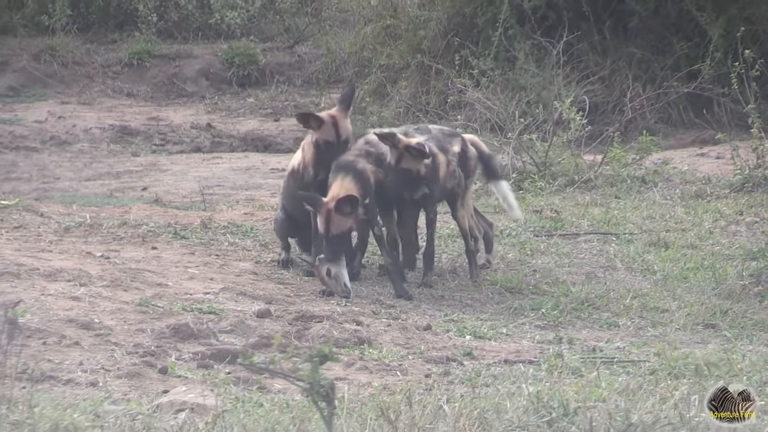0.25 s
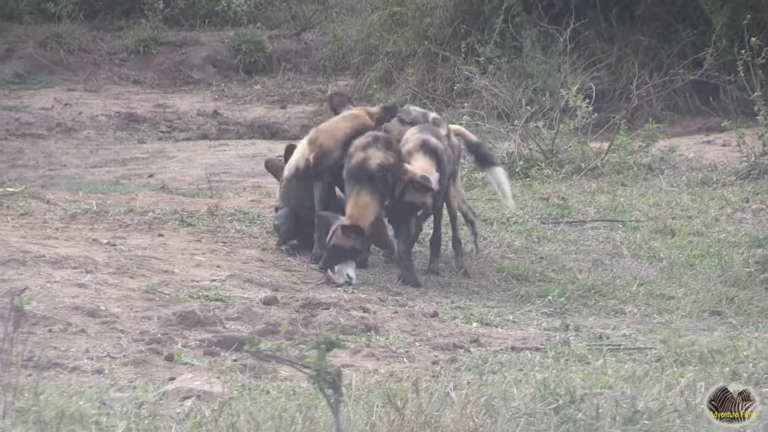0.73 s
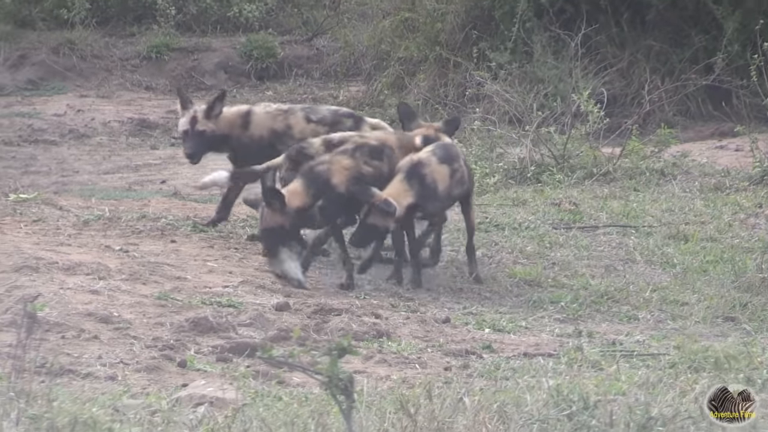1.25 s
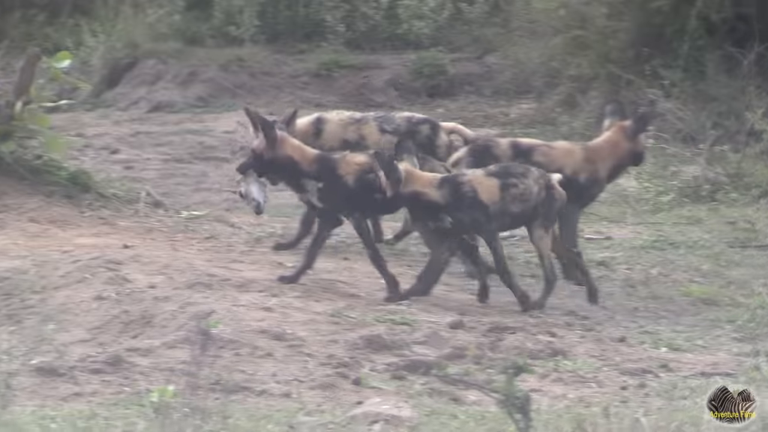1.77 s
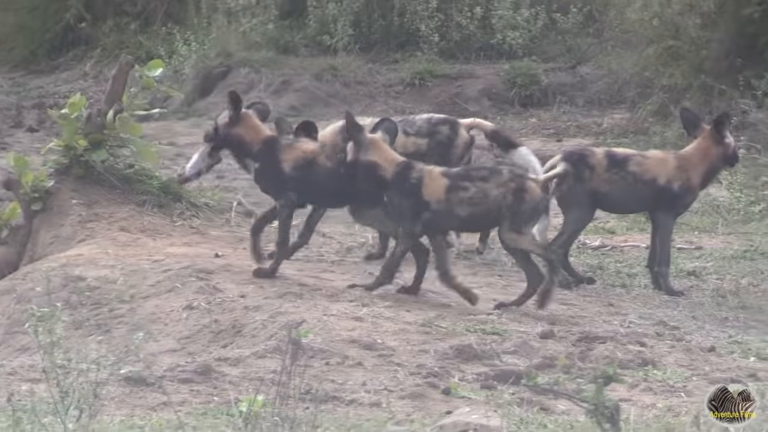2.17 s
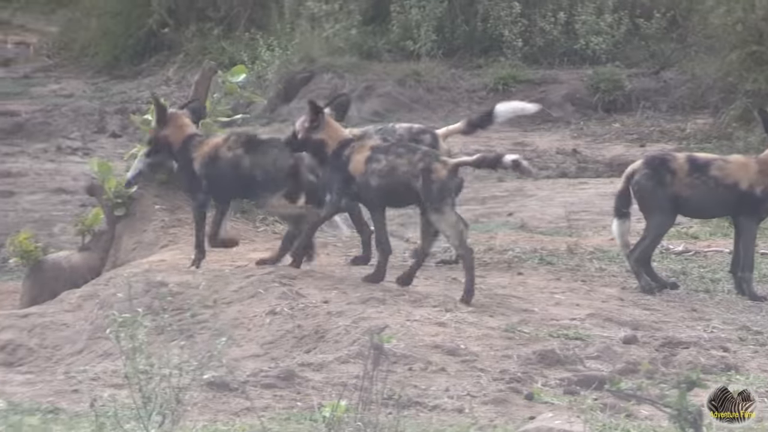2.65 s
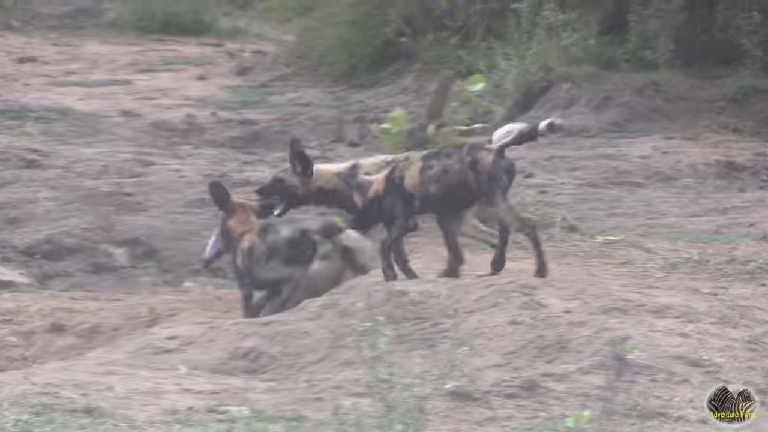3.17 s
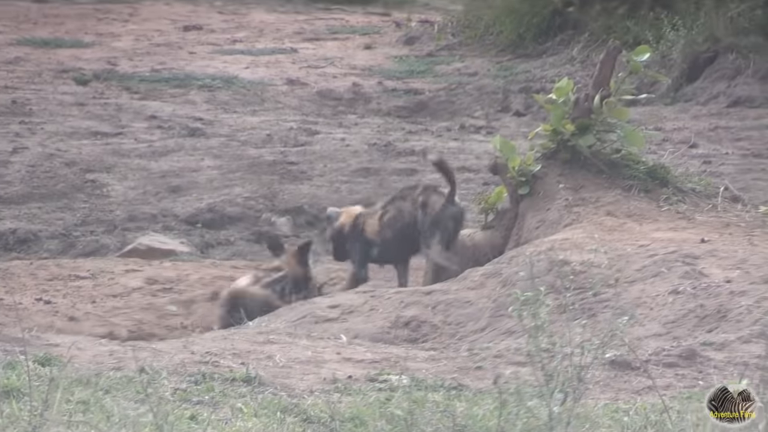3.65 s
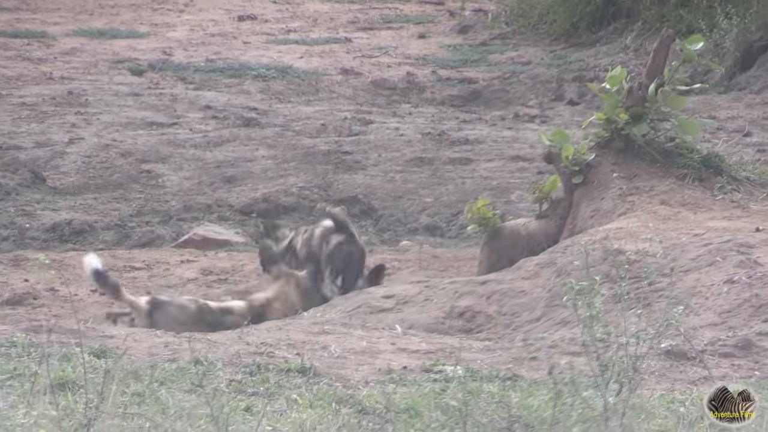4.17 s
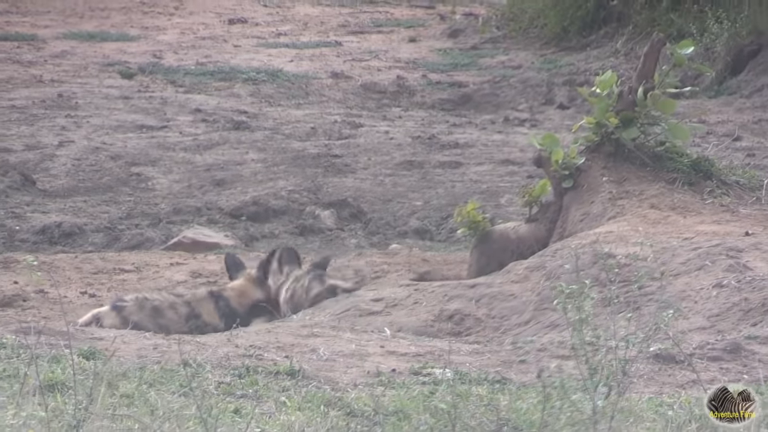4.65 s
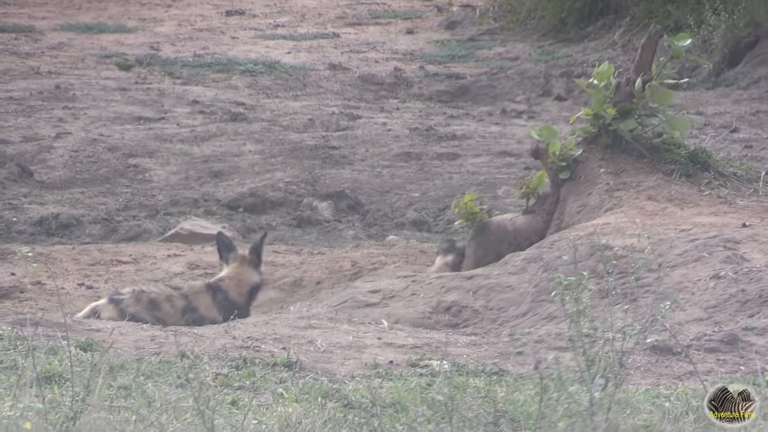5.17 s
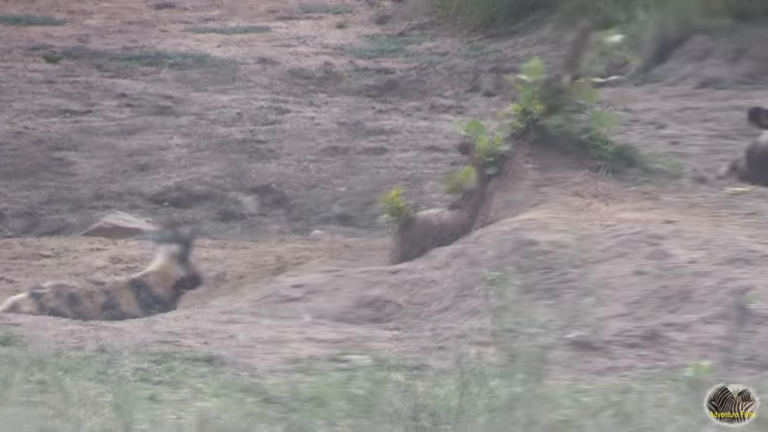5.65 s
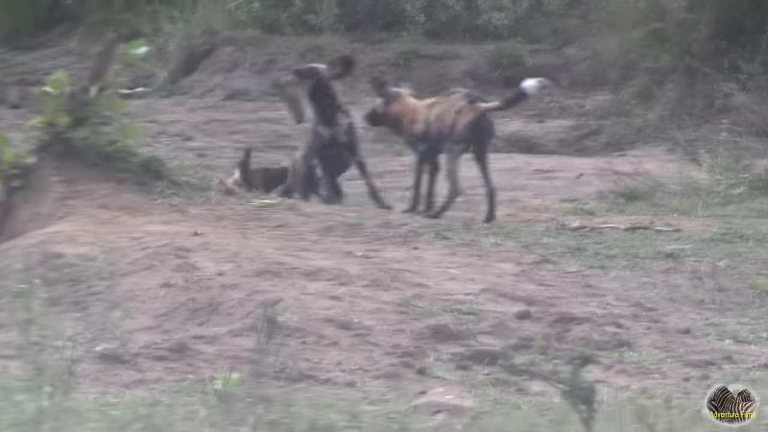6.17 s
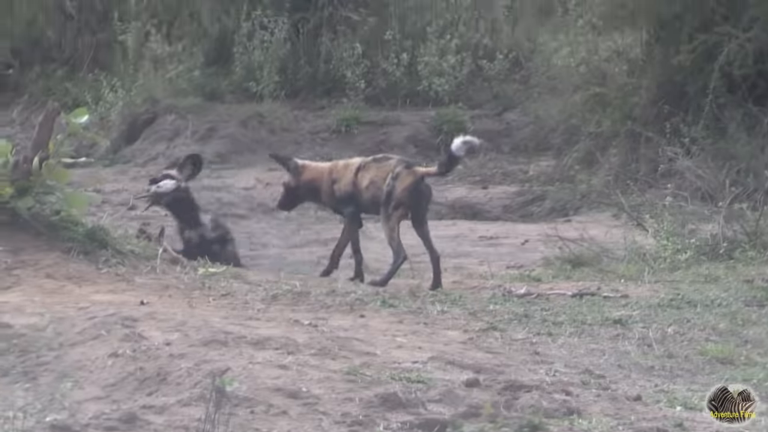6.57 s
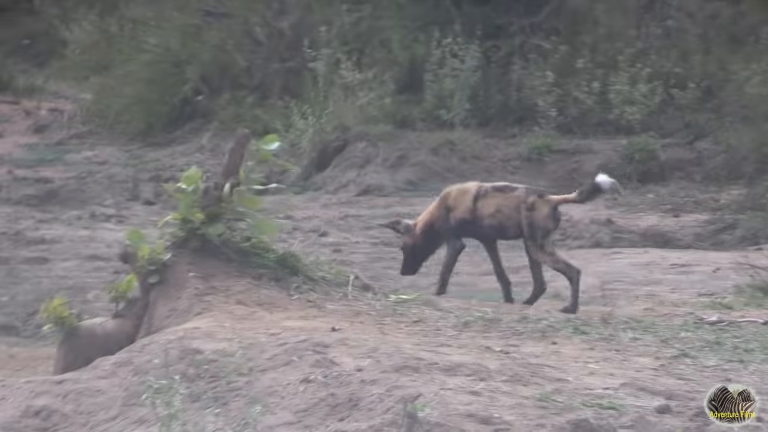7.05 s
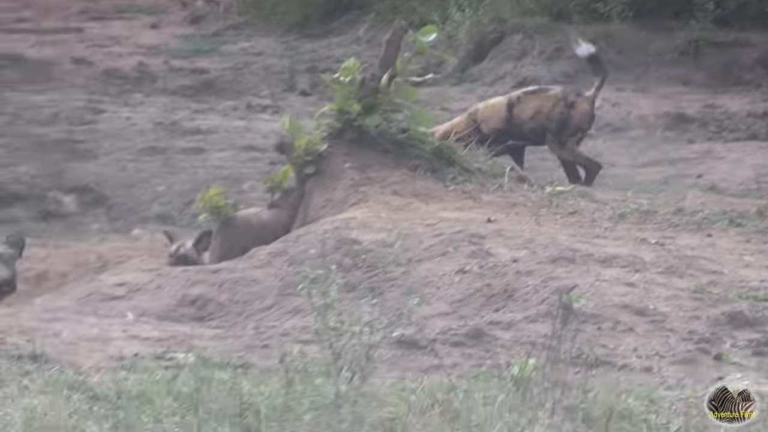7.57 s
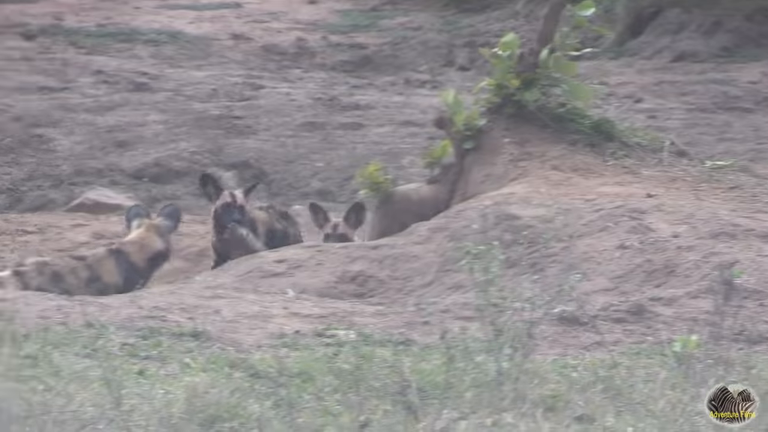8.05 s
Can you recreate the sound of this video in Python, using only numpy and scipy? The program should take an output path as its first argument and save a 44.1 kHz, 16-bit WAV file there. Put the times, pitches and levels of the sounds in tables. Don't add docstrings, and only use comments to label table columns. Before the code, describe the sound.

Open bush, wind gusting low and lumpy on an exposed microphone over soft air, insect hiss and a faint motor hum. Small birds and young wild dogs twitter, buzz and yelp faintly far off, with two runs of peeps. Near five seconds heavy wind blows thump while a warbler chirps quickly. From six seconds a close ground bird dominates with piercing squeals, pips and raspy croaks, repeated rhythmically until the end.

```python
import sys
import numpy as np
from scipy import signal
from scipy.fft import rfft, irfft, next_fast_len
from scipy.io import wavfile
from scipy.ndimage import uniform_filter1d

SR = 44100
rng = np.random.default_rng(int(sys.argv[2]) if len(sys.argv) > 2 else 0)


def to_wav(s):
    ch = np.atleast_2d(s).T
    pcm = np.round(np.clip(ch, -1, 1) * 32767)
    wavfile.write(sys.argv[1], SR, pcm.astype(np.int16))


def invert_db(x):
    u = np.asarray(x, float) / 20
    return 10 ** u


N = 366471

# t/s, level/dB, extra flutter level/dB
WIND_STRENGTH = [(0, -45.5, -2.5), (.5, -41.5, -2), (.7, -48, -1.5), (1.2, -48.5, -2.5), (2.2, -48, -10.5),
                 (2.55, -48, 1.5), (2.9, -43.5, -17), (3.3, -46.5, 1.5), (3.8, -44, -6), (4.75, -43.5, 3.5),
                 (4.9, -38.5, 10.5), (5.5, -36, 6.5), (5.95, -38, 6), (6.2, -36.5, 1.5), (7, -36, -1),
                 (7.548, -34.5, -5.5), (8.05, -41, -4.5), (8.31, -53, 23)]
# t/s, extra thud level/dB, extra flutter level/dB
GUSTS = [(.22, 4.5, 8.5), (.44, 6.5, 5.5), (2.7, -31, -3.5), (3.4, 4, 6.5), (3.6, 3.5, 13.5),
         (4.08, 5.5, 9), (3.95, -1, 4.5), (4.3, -2.5, -7), (4.4, 1.5, 2.5), (4.87, 3, 2.5), (5.02, 2, 2.5),
         (5.11, -1, -23), (5.25, 0, -0.5), (5.34, 7, 6), (5.441, 8.5, 1.5), (5.87, 2, 4.5), (6.06, -1, -30),
         (6.82, 0.5, 3.5), (7.0, 2.5, -3), (6.322, -4, 7), (6.48, -3, -7), (6.7, -0.5, -1.5),
         (7.174, -7, 8), (7.3, 0.5, -6), (7.42, -9, 5), (7.66, -6.5, -8), (7.73, -6, -5), (7.91, 0.5, 5)]
# f/Hz, level/dB per Hz
THUD_COLOUR = [(10, -8), (25, 2), (45, 3), (70, -6.5), (110, -33), (200, -67)]
# f/Hz, level/dB per Hz
FLUTTER_COLOUR = [(40, -26), (70, 2), (110, -3), (170, -11.5), (270, -22), (450, -36.5), (800, -97)]
GUST_S = 0.049
FLUTTER_DB, FLUTTER_SLOPE, CALM_DB = -54.5, 1.606, -46.5

# f/Hz, level/dB per Hz
AIR_COLOUR = [(71, -29), (120, -5.5), (196, -4.5), (445, -6), (513, -5.5), (580, -5.5), (874, -13),
              (1050, -16.5), (1140, -17.5), (1400, -20), (2020, -25), (2240, -22), (4140, -25),
              (14700, -28), (16000, -25.5)]
# f/Hz, level/dB per Hz
HISS_COLOUR = [(18, -14), (30, -20), (71, -10), (145, -32), (287, -24), (2350, -19), (7270, -18),
               (16000, -18.5)]
# f/Hz, waver as share of f, level/dB
MOTOR_HUM = [(516.4, 0.0046, -70), (1049, 0.00051, -72)]
# f/Hz, width/Hz, level/dB
DRONE = [(200, 27, -66.5), (282, 32, -69), (351, 65, -68), (2290, 460, -77)]
AIR_DB, HISS_DB = -60.5, -72

# f/Hz, t60/s
SCRUB_DECAY = [(500, 0.4), (2500, 0.78), (7000, 0.41), (14000, 0.037)]

# t/s, length/s, start f/Hz, end f/Hz, level/dB
TWITTER = [(-.02, 0.063, 5500, 3860, -60.5), (0.025, 0.08, 3800, 2950, -71), (.028, 0.042, 5900, 4850, -69),
           (0.074, 0.05, 4700, 4200, -72), (0.712, 0.045, 3775, 3260, -74),
           (1.036, 0.031, 3850, 2670, -67.5), (1.062, .03, 2680, 2610, -69), (1.182, .05, 5500, 4900, -76),
           (1.243, 0.066, 3950, 3260, -75), (1.54, .04, 5130, 4800, -72), (1.833, .07, 5600, 4500, -78),
           (2.018, .022, 4700, 3700, -76), (2.036, 0.0255, 3730, 2830, -69), (2.11, .04, 5800, 5530, -76),
           (2.27, 0.045, 4800, 3900, -71), (3.418, 0.082, 5800, 4800, -75)]
# t/s, length/s, f/Hz, width/Hz, level/dB
BUZZES = [(0.0, 0.11, 5600, 2490, -70.5), (3.237, 0.079, 2369, 604, -64), (3.29, 0.073, 1760, 400, -71),
          (3.307, 0.65, 1245, 200, -76.5), (3.511, 0.22, 1940, 326, -75), (3.61, 0.06, 5200, 2600, -71),
          (3.675, 0.085, 5840, 2000, -69), (3.735, .06, 2250, 500, -66.5), (3.784, 0.1, 1860, 496, -70),
          (3.945, 0.084, 6060, 1820, -70), (4.037, 0.12, 2150, 533, -72.5),
          (4.384, 0.021, 1840, 1500, -65.5), (4.386, .032, 900, 200, -60), (5.312, 0.13, 4240, 1500, -66),
          (5.335, .087, 6600, 1215, -74), (5.587, 0.022, 2710, 3000, -62), (5.683, 0.1, 2460, 463, -57.5),
          (5.821, 0.064, 2460, 412, -56.5)]
# t/s, length/s, start f/Hz, end f/Hz, level/dB
WARBLE = [(.79, 0.045, 5800, 5150, -81), (.825, .05, 5200, 4700, -75), (4.973, 0.067, 6320, 5330, -63),
          (5.021, 0.05, 5400, 4800, -56), (5.058, 0.039, 4930, 3700, -62), (4.892, 0.041, 4040, 3760, -61),
          (4.919, 0.02, 3880, 3550, -49), (4.94, 0.044, 3680, 3000, -65), (4.97, 0.12, 3220, 2200, -77),
          (4.99, 0.04, 3900, 3600, -68), (5.07, .025, 7000, 5600, -71), (5.093, .015, 5450, 5330, -69),
          (5.13, .02, 4950, 4700, -72), (4.87, .014, 5200, 4500, -71), (5.247, 0.035, 3870, 3630, -62),
          (5.27, 0.058, 7600, 6460, -69), (5.298, .035, 6300, 4300, -70), (5.523, 0.043, 3700, 3490, -53.5),
          (5.61, 0.032, 3600, 3560, -68), (5.648, 0.012, 3150, 3530, -55),
          (5.659, 0.027, 3450, 2980, -49.5), (5.73, 0.05, 3450, 3140, -65),
          (5.79, 0.039, 2910, 2760, -55.5)]
# t/s, length/s, start f/Hz, end f/Hz, level/dB
WHINES = [(.865, .035, 4600, 3800, -68.5), (3.885, 0.14, 4300, 3470, -68), (3.892, 0.13, 7150, 6200, -68),
          (3.9, .071, 5700, 5400, -74), (3.9, 0.038, 2900, 2880, -73), (5.84, 0.088, 4750, 3580, -73)]
# t/s, length/s, start f/Hz, end f/Hz, level/dB
YELPS = [(3.61, 0.086, 4800, 3100, -64), (3.615, 0.086, 8000, 4300, -66), (3.603, .03, 5100, 5700, -70),
         (3.67, 0.086, 5300, 4000, -64), (3.622, 0.049, 9000, 7000, -65), (3.65, 0.042, 7400, 6200, -68),
         (3.67, 0.076, 9400, 6800, -70)]
# t/s, length/s, f/Hz, beats/Hz, beat depth, level/dB
TRILL = (2.05, .285, 2905, 103, 1.0, -67)
# t/s, top f/Hz, level/dB
PEEPS = [
    (2.166, 3230, -69),
    (2.262, 3240, -62.5),
    (2.36, 3060, -61.5),
    (2.459, 3040, -62.5),
    (2.872, 3100, -56),
    (2.975, 3200, -56.5),
    (3.072, 3150, -60),
    (3.178, 3090, -65.5),
]
# t/s, level/dB
TICKS = [(4.591, -63), (4.621, -64), (4.655, -66), (4.69, -65), (4.735, -68)]
TICK_GLIDE = (4300, 7000)
SAG = -0.16
WHINE_ARCH, WARBLE_SAG = 0.1, -0.0136
PEEP_ARCH_HZ, PEEP_S, PEEP_SHARP = 570, 0.035, 0.96
TICK_S, TICK_BEND, TICK_ECHO_DB = 0.0109, 0.114, -5
BUZZ_PER_S, BUZZ_SLOPE = 14, 0.47

# t/s, peak level/dB, f/Hz
BUFFETS = [
    (4.848, -29.5, 45.8),
    (4.848, -23.5, 99),
    (5.077, -24.5, 65),
    (5.219, -38, 45.5),
    (5.218, -21, 94.7),
    (5.319, -18.5, 111),
    (5.418, -17, 80),
    (5.545, -22.5, 45.8),
    (5.735, -22.5, 72.7),
    (5.802, -26, 50.3),
]
BUFFET_TURNS = 1.64

# t/s, f/Hz, partial 1 level/dB, partial 2 level/dB
SQUEALS = [
    [(5.997, 2440, -35, -34), (6.007, 2472, -28.5, -31.5), (6.037, 2398, -32.5, -40.5),
     (6.085, 2394, -29, -38.5), (6.098, 2320, -37, -47), (6.108, 2200, -45, -55)],
    [(6.608, 2540, -41, -31), (6.618, 2570, -27, -35.5), (6.642, 2449, -27, -27.5),
     (6.664, 2420, -20.5, -36.5), (6.726, 2356, -33, -32.5), (6.738, 2370, -40, -62)],
    [(7.252, 2590, -26, -44), (7.26, 2527, -29, -33.5), (7.28, 2487, -27, -25.5),
     (7.292, 2416, -19.5, -36.5), (7.338, 2385, -31.5, -29), (7.372, 2347, -26, -53)],
    [(7.934, 2640, -51, -61), (7.94, 2534, -26.5, -36.5), (7.962, 2500, -24, -23.5),
     (7.972, 2426, -19, -36), (8.024, 2382, -31, -28), (8.05, 2380, -25, -47)],
]
SQUEAL_THIRD_DB = [-14, -18, -23.5, -23.5]
UPPER_DB = [-22, -34, -36]
HOOK_UPPER_DB = [-11.5, -26, -31, -31]
PIP_UPPER_DB = [-9, -18, -27]

# t/s from the peak, f ratio, partials 1-3 level/dB from the peak
FIRST_HOOK = [(-.02, .93, -15, -8, -6), (-.012, .97, -4, -4, -7), (-.004, 0.98, -0.5, -3, -3.5),
              (.008, 1, -2, -10, -6.5), (.014, .9, -12, -6, -17), (.024, 0.83, -16, -8, -30)]
HOOK = [(-.022, .9, -8, -27.5, -28), (-.016, .95, -2.5, -16, -22), (-.012, 0.99, -11, -8, -14.5),
        (-.008, 0.98, 1, -4.5, -12), (-.002, 0.96, -11.5, -3, -13.5), (.005, 0.98, -2.5, -0.5, -15),
        (.012, 0.91, -10.5, -5, -32), (.022, 0.94, -31, -10, -36)]
SPLIT_PIP = [(-.01, 1.003, -2, -20, -27), (0, 0.989, -13, -3.5, -26), (.007, .985, -20, -8, -24),
             (.01, .98, -33, -25, -29), (.014, .97, -12, -11, -22), (.018, .92, -12, -17, -26),
             (.028, 0.72, -26, -16, -43)]
PIP = [(-.01, 1.003, -2, -20, -31), (0, 0.989, -14, -2, -27), (.012, 0.984, -13.5, -9, -26),
       (.018, .94, -16, -14.5, -30), (.028, 0.76, -29, -13, -42)]
THROB = [(-.006, 1.04, -28, -30, -15), (.002, 1.02, -19, 5.5, -13), (.011, 1, -40, -12.5, -14),
         (.019, 1, -18, 3, -16.5), (.027, 1, -28, -18, -17), (.034, .99, -29, -2, -17),
         (.046, 1.1, -35, -15, -20.5)]
# peak t/s, f/Hz, level/dB
FIRST_HOOKS = [(6.114, 2108, -33.5)]
HOOKS = [(6.733, 2219, -27), (7.378, 2180, -29.5), (8.066, 2160, -27.5)]
SPLIT_PIPS = [(6.29, 2420, -18)]
PIPS = [(6.944, 2415, -22), (7.603, 2430, -20)]
THROBS = [(6.344, 1262, -27), (6.999, 1270, -26), (7.661, 1252, -25.5)]

# t/s from the mark, level/dB
OPENING = [(-.024, -19), (.002, 1), (.012, -41.5)]
TURNING = [(-.014, -6.5), (0, 2), (.014, 4.5)]
ENDING = [(-.018, -14.5), (-.004, -7), (.012, -9.5), (.024, -20), (.04, -38)]
RISING = [(-.016, -28.5), (-.006, -7.5), (0, -1.5), (.012, 2.5), (.017, 2), (.022, -9)]
SNAPPING = [(-.011, -15), (0, -1), (.012, -7), (.028, -22)]
CROAK = [(-.01, -8), (-.001, -5), (.027, -4), (.05, -7), (.058, -8.5), (.07, -20)]
RASP = [(-.014, -19), (-.005, -6), (.012, -0.5), (.03, -6), (.048, -22)]
LAST_RASP = [(-.028, -17), (-.012, -3), (0, 0.5), (.012, -9), (.029, -30)]
# mark t/s, effort level/dB
OPENINGS = [(5.994, -46.5), (6.615, -42), (7.255, -41.5), (7.938, -41.5)]
TURNINGS = [(6.096, -44), (6.713, -42.5), (7.359, -43.5), (8.048, -42)]
ENDINGS = [(6.133, -32.5), (6.749, -32), (7.399, -30), (8.088, -31)]
RISINGS = [(6.267, -37.5), (6.924, -38), (7.586, -37.5)]
SNAPPINGS = [(6.313, -35.5), (6.967, -35), (7.626, -34.5)]
CROAKS = [(6.344, -25.5), (7.0, -23.5), (7.662, -24)]
RASPS = [(6.452, -35), (7.114, -34), (7.777, -36.5)]
LAST_RASPS = [(6.523, -44), (7.178, -40), (7.839, -44.5)]

# slack f/Hz, tense f/Hz, width/Hz, level/dB
OPENING_PIPE = [(1000, 1750, 520, 1.8), (2000, 3600, 230, 6.2), (2950, 3070, 180, 21.4),
                (3700, 3100, 2000, 12.3), (4600, 4600, 720, 5.5)]
SCRAPE_PIPE = [(970, 2140, 224, -0.5), (2250, 2880, 300, 14), (3000, 2320, 100, 11.5),
               (3700, 3840, 1600, 11), (4800, 3760, 490, 8)]
RISING_PIPE = [(900, 1600, 110, -3.5), (1670, 4100, 130, 7), (2290, 2730, 186, 11.5),
               (2900, 3000, 320, 14.5), (3400, 3990, 680, 9), (4300, 4360, 730, 3)]
CROAK_PIPE = [(567, 690, 160, -15), (1156, 1400, 130, -12), (1715, 2000, 85, 2), (2320, 2310, 220, -1.5),
              (2900, 4600, 120, -10), (3440, 3100, 240, 2.5), (3950, 3730, 330, 3.5),
              (4500, 4500, 340, -8.5), (4800, 4000, 180, 4)]
RASP_PIPE = [(900, 900, 190, -12.5), (1500, 1780, 890, -6), (2260, 2180, 195, 2), (2500, 2510, 200, 6.5),
             (3060, 3040, 160, 0.5), (3800, 3640, 450, 2), (4440, 4500, 250, -4.5), (4800, 6200, 200, -3.5),
             (5400, 5300, 300, -13.5)]
BEAK = [(5530, 5810, 540, 14), (6540, 7300, 400, 8.5), (7370, 9740, 1900, 0), (11300, 9000, 2500, -7)]
SWEEP = [(3100, 4600, 200, 2)]
# delay t/s, level/dB
BANKS = [(0.051, -41), (0.085, -41.5), (.121, -39), (.157, -38)]
DULLING_DB = 4
CREST = 2.0


def evened(x):
    return x / np.sqrt(np.mean(x ** 2) + 1e-20)


def read(points, hz):
    f, value = np.transpose(points)
    return np.interp(np.log(hz + 1), np.log(f + 1), value)


def add(mix, s, sound):
    at = round(s * SR)
    part = mix[max(at, 0):max(at + len(sound), 0)]
    part += sound[max(-at, 0):][:len(part)]


def wander(size, span):
    return evened(uniform_filter1d(rng.standard_normal(size), max(int(span), 1)))


def sine(hz):
    return np.sin(2 * np.pi * np.cumsum(hz) / SR)


def band(x, low_hz, high_hz):
    return signal.sosfilt(signal.butter(2, [low_hz, high_hz], "bandpass", fs=SR, output="sos"), x)


def resonate(x, hz, width):
    turn = np.exp(2j * np.pi * np.cumsum(hz * np.ones(len(x))) / SR)
    r = np.exp(-np.pi * width / SR)
    return 2 * (turn * signal.lfilter([(1 - r) ** 2], [1, -2 * r, r * r], x / turn)).real


def pulses(per_s, uneven_db, alternate):
    turns = np.floor(np.cumsum(per_s) / SR)
    size = invert_db(uneven_db * rng.standard_normal(len(turns))) * (1 - alternate * (turns % 2))
    return (np.diff(turns, prepend=-1) > 0) * size


def noise(colour, patchy_db):
    frames, hz = N // 256 + 5, np.fft.rfftfreq(1024, 1 / SR)
    a, b, patches = rng.standard_normal((frames, 513, 3)).T
    patches = evened(uniform_filter1d(uniform_filter1d(patches, 6, 0), 6, 1))
    z = (a + 1j * b) * invert_db(read(colour, hz)[:, None] + patchy_db * patches)
    return evened(signal.istft(z, nperseg=1024, noverlap=768)[1][:N])


def scrub(x, gap, quicker):
    taps = np.zeros(SR)
    at = np.arange(int(gap * SR), SR - 20, 20)
    taps[at + rng.integers(0, 20, len(at))] = rng.choice([-1., 1.], len(at))
    hz, t, z = signal.stft(taps, SR, nperseg=256)
    decay_db = -60 * quicker * t / read(SCRUB_DECAY, hz)[:, None]
    tail = signal.istft(z * invert_db(decay_db), SR, nperseg=256)[1]
    return signal.fftconvolve(x, tail / np.linalg.norm(tail))[:N]


def wind():
    t = np.arange(N // 64 + 2) * 64 / SR
    at, *controls = np.transpose(WIND_STRENGTH)
    strength_db, buffet_db = (np.interp(t, at, c) for c in controls)
    s, *extra_db = np.transpose(GUSTS)
    thud_db, flutter_db = extra_db @ np.exp(-((t - s[:, None]) / GUST_S) ** 2)
    thud_db = thud_db + strength_db
    flutter_db = flutter_db + buffet_db + FLUTTER_DB + FLUTTER_SLOPE * (strength_db - CALM_DB)
    thud_db, flutter_db = (np.interp(np.arange(N) / SR, t, c) for c in (thud_db, flutter_db))
    size = next_fast_len(N)
    hz = np.fft.rfftfreq(size, 1 / SR)
    thud, flutter = (evened(irfft(rfft(rng.standard_normal(size)) * invert_db(read(colour, hz)), size)[:N])
                     for colour in (THUD_COLOUR, FLUTTER_COLOUR))
    lumps = invert_db(3.75 * evened(resonate(wander(N, 410), 0, 47.6)))
    pressure = invert_db(thud_db) * thud + invert_db(flutter_db) * evened(flutter * lumps)
    return pressure * invert_db([[.11], [-.11]])


def background():
    hum = sum(invert_db(db) * np.sqrt(2) * sine(hz * (1 + waver * wander(N, 3000)))
              for hz, waver, db in MOTOR_HUM)
    drone = sum(invert_db(db) * evened(resonate(rng.standard_normal(N), hz, width)) for hz, width, db in DRONE)
    air = invert_db(AIR_DB) * noise(AIR_COLOUR, patchy_db=2.0)
    apart = invert_db(HISS_DB) * noise(HISS_COLOUR, patchy_db=0.0) * np.array([[1], [-1]])
    return hum + drone + air + apart


def chirp(length, start_hz, end_hz, db, bend, sharp=.7, shaky=.014, lean=.8):
    u = np.linspace(0, 1, int(length * SR))
    glide = start_hz + (end_hz - start_hz) * u
    hz = glide * (1 + 4 * bend * u * (1 - u) + shaky * wander(len(u), 60))
    swell = invert_db(db + 1.5 * wander(len(u), 250)) * abs(np.sin(np.pi * u ** lean)) ** sharp
    return np.sqrt(2) * swell * sine(hz)


def twitter(out):
    for s, length, start_hz, end_hz, db in TWITTER:
        add(out, s, chirp(length, start_hz, end_hz, db, SAG * np.log(start_hz / end_hz)))


def buzzes(out):
    for s, length, hz, width, db in BUZZES:
        size, per_s = int(length * SR), BUZZ_PER_S * width ** BUZZ_SLOPE
        beats = pulses(per_s * (1 + .08 * wander(size, 400)), uneven_db=2, alternate=0)
        puffs = beats + .3 * signal.lfilter([1], [1, -.99], beats) * rng.standard_normal(size)
        ring = resonate(resonate(puffs, hz, 1.6 * width), hz, 1.6 * width)
        add(out, s, invert_db(db) * evened(ring) * signal.windows.tukey(size, .3))


def warbler(out):
    for s, *shape in WARBLE:
        add(out, s, chirp(*shape, WARBLE_SAG))


def young_dogs(out):
    for s, *shape in WHINES:
        add(out, s, chirp(*shape, WHINE_ARCH))
    for s, length, start_hz, end_hz, db in YELPS:
        add(out, s, chirp(length, start_hz, end_hz, db - 2, SAG * np.log(start_hz / end_hz), shaky=.028))


def trill(out):
    s, length, hz, per_s, depth, db = TRILL
    t = np.arange(0, length, 1 / SR)
    size = len(t)
    beat = np.cos(2 * np.pi * per_s * t + .6 * wander(size, 1500)) * np.linspace(1, .45, size)
    level = invert_db(db + 1.5 * wander(size, 900) - 150 * np.maximum(t - .21, 0))
    tone = sine(hz * (1 + .014 * beat + .005 * wander(size, 700)))
    add(out, s, level * (1 + depth * beat) * tone * signal.windows.tukey(size, .15))


def peeps(out):
    for s, top_hz, db in PEEPS:
        foot_hz = top_hz - PEEP_ARCH_HZ
        add(out, s, chirp(PEEP_S, foot_hz, foot_hz, db, PEEP_ARCH_HZ / foot_hz, PEEP_SHARP, .003, 1.1))


def ticks(out):
    dry_ticks = np.zeros(N)
    for s, db in TICKS:
        add(dry_ticks, s, chirp(TICK_S, *TICK_GLIDE, db, TICK_BEND, .5, .04))
    out += dry_ticks + invert_db(TICK_ECHO_DB) * scrub(dry_ticks, gap=.001, quicker=5.8)


def far_calls():
    out = np.zeros(N)
    for source in (twitter, buzzes, warbler, young_dogs, trill, peeps, ticks):
        source(out)
    return out


def buffets():
    out = np.zeros(N)
    for s, db, hz in BUFFETS:
        u = np.linspace(0, 1, int(BUFFET_TURNS * 2 / hz * SR))
        swing = np.cos(4 * np.pi * BUFFET_TURNS * u + 2 * np.pi * rng.random())
        add(out, s, invert_db(db - 2.5) * np.sin(np.pi * u ** 0.86) ** 2 * swing)
    return out


def unfold(rows):
    s, *columns = np.transpose(rows)
    t = np.arange(s[0], s[-1], 1 / SR)
    return s[0], [np.interp(t, s, c) for c in columns]


def marked(shape, events):
    return [np.add(shape, event) for event in events]


def pitched(shape, events):
    return [np.multiply(shape, [1, hz, 1, 1, 1]) + [s, 0, db, db, db] for s, hz, db in events]


def through(x, modes, tension):
    out = 0
    for slack_hz, tense_hz, width, db in modes:
        flicker = invert_db(db + 1.5 * wander(len(x), 120))
        out = out + flicker * resonate(x, slack_hz + (tense_hz - slack_hz) * tension, width)
    return out


def croak(rows, pipe, rate_hz, jitter, rough, tensing, curve, bright_db, lift_db, sweep_db=-40):
    s, (effort_db,) = unfold(rows)
    size = len(effort_db)
    tension = (np.linspace(0, 1, size) ** curve)[::1 if tensing else -1]
    per_s = rate_hz * (1 + .02 * tension + jitter * wander(size, 200))
    beats = pulses(per_s, uneven_db=1.2, alternate=.4)
    puffs = signal.lfilter([1], [1, -.985], beats) * rng.standard_normal(size)
    drive = (1 - rough) * evened(beats - beats.mean()) + rough * evened(puffs)
    sound = evened(through(drive, pipe, tension))
    beak_gain = invert_db(bright_db - DULLING_DB * (.5 - tension))
    sound = sound + beak_gain * evened(through(drive, BEAK, tension))
    sound = sound + invert_db(sweep_db) * evened(through(drive, SWEEP, tension))
    sound = 1.1 * CREST * np.tanh(sound / CREST)
    return s, invert_db(effort_db + lift_db) * sound * signal.windows.tukey(size, .25)


def harsh_notes():
    out = np.zeros(N)
    smear, blur, sweep_db = .33, .38, -7
    for rows in marked(OPENING, OPENINGS):
        add(out, *croak(rows, OPENING_PIPE, 550, 0.045, blur, True, 2.4, bright_db=-9, lift_db=8.5))
    for rows in marked(TURNING, TURNINGS):
        add(out, *croak(rows, SCRAPE_PIPE, 550, 0.043, blur, True, 2.4,
                        bright_db=-10.0, lift_db=9.0, sweep_db=sweep_db))
    for rows in marked(ENDING, ENDINGS) + marked(SNAPPING, SNAPPINGS):
        add(out, *croak(rows, SCRAPE_PIPE, 530, 0.044, blur, False, 2.5,
                        bright_db=-26.0, lift_db=10.0, sweep_db=sweep_db))
    for rows in marked(RISING, RISINGS):
        add(out, *croak(rows, RISING_PIPE, 550, 0.048, blur, True, 0.97, bright_db=-12.5, lift_db=11.5))
    for rows in marked(CROAK, CROAKS):
        add(out, *croak(rows, CROAK_PIPE, 568, .018, smear, False, 0.8, bright_db=-13.5, lift_db=-0.2))
    for rows in marked(RASP, RASPS) + marked(LAST_RASP, LAST_RASPS):
        add(out, *croak(rows, RASP_PIPE, 540, 0.03, blur, False, 1.2, bright_db=-17.5, lift_db=4.5))
    return band(out, 800, 7500)


def whistle(rows, upper_db, shaky=0.0066):
    s, (hz, *partials_db) = unfold(rows)
    partials_db += [partials_db[2] + db for db in upper_db]
    phase = 2 * np.pi * np.cumsum(hz * (1 + shaky * wander(len(hz), 51))) / SR
    tone = sum(invert_db(db) * np.sin((k + 1) * phase) for k, db in enumerate(partials_db))
    return s, np.sqrt(2) * tone * signal.windows.tukey(len(hz), min(.009 * SR / len(hz), 1))


def pure_notes():
    out = np.zeros(N)
    for rows, third_db in zip(SQUEALS, SQUEAL_THIRD_DB):
        add(out, *whistle([(*row, row[-1] + third_db) for row in rows], UPPER_DB))
    for rows in pitched(FIRST_HOOK, FIRST_HOOKS) + pitched(HOOK, HOOKS):
        add(out, *whistle(rows, HOOK_UPPER_DB, shaky=0.005))
    for rows in pitched(SPLIT_PIP, SPLIT_PIPS) + pitched(PIP, PIPS):
        add(out, *whistle(rows, PIP_UPPER_DB))
    for rows in pitched(THROB, THROBS):
        add(out, *whistle(rows, UPPER_DB, shaky=0.014))
    return out


def near_bird():
    harsh, pure = harsh_notes(), pure_notes()
    grass = invert_db(-13) * scrub(harsh, gap=.0005, quicker=8.4)
    banks = sum(invert_db(db) * np.pad(pure + .15 * harsh, (round(s * SR), 0))[:N] for s, db in BANKS)
    return pure + harsh + band(banks, 3600, 6600) + grass


def scene():
    air = wind() + background() + buffets()
    far, near = far_calls(), near_bird()
    far_echo = invert_db(-13) * scrub(far, gap=.002, quicker=5.0)
    near_echo = invert_db(-30) * scrub(near, gap=0.0096, quicker=1.2)
    return near + near_echo + far + far_echo + air


def top_cut(x):
    return signal.sosfilt(signal.butter(12, 16280, fs=SR, output="sos"), x)


def record(dry):
    edge = signal.firwin(801, 15760, window=("kaiser", 9), fs=SR)
    mix = signal.oaconvolve(dry, edge[None], "same")
    return top_cut(mix)


dry = scene()
out = record(dry)
to_wav(out)
```